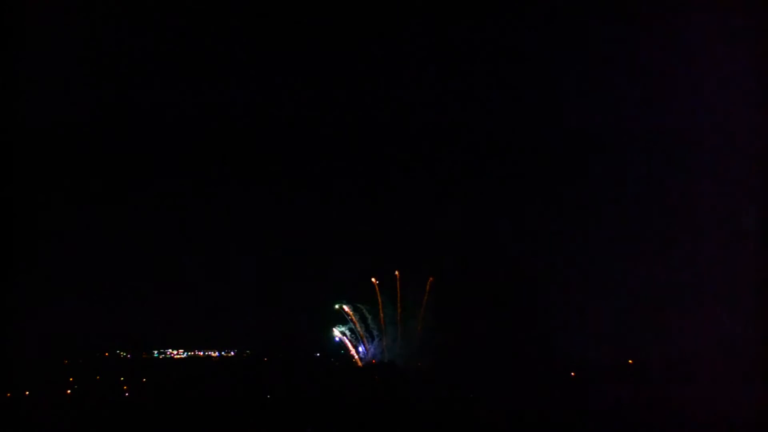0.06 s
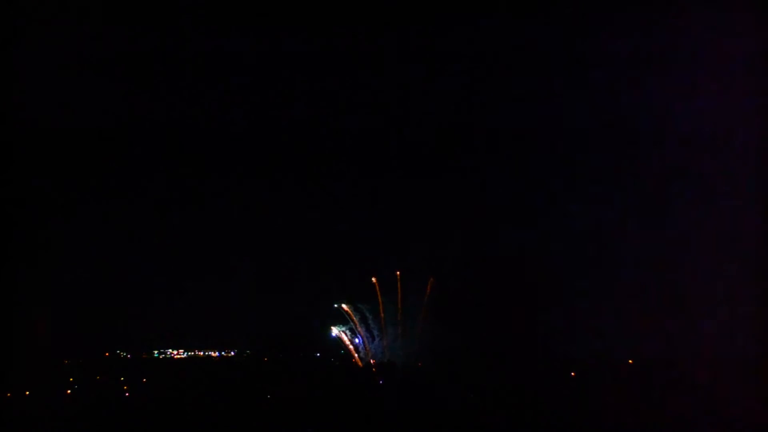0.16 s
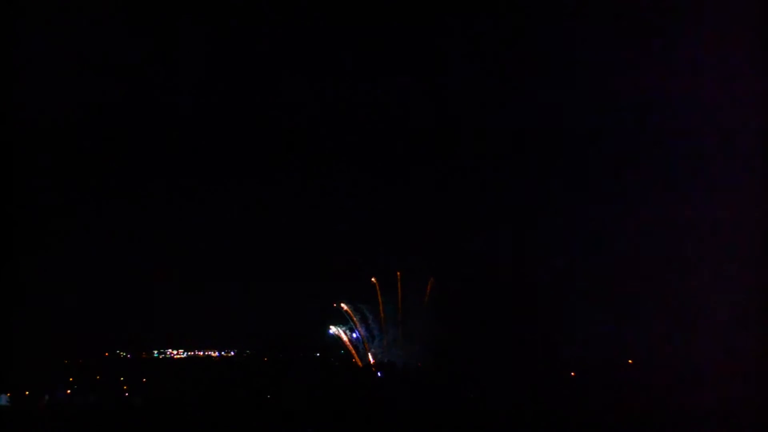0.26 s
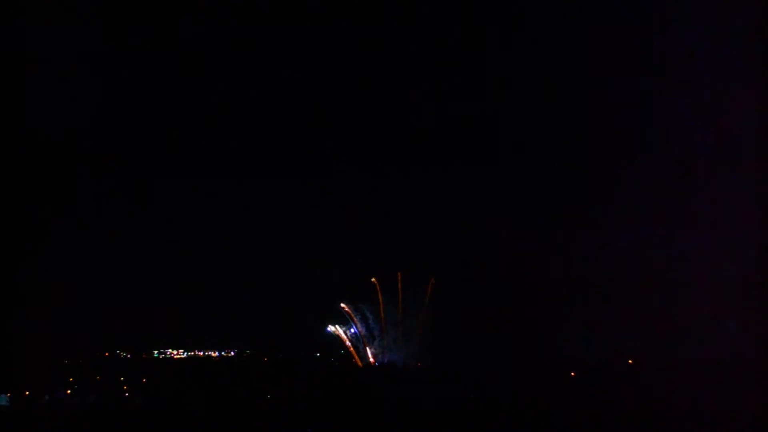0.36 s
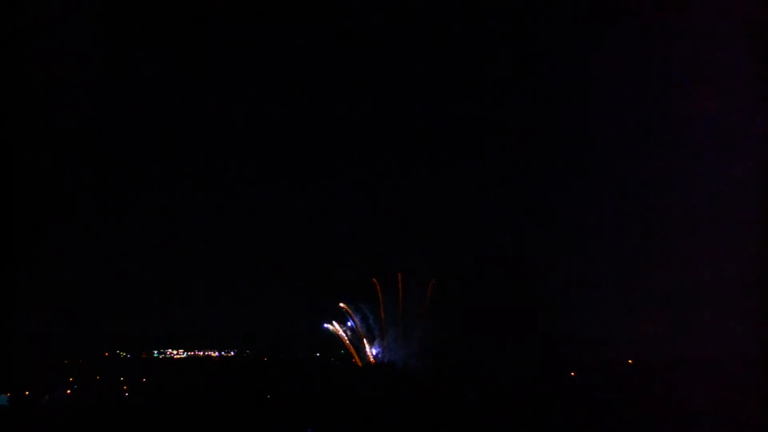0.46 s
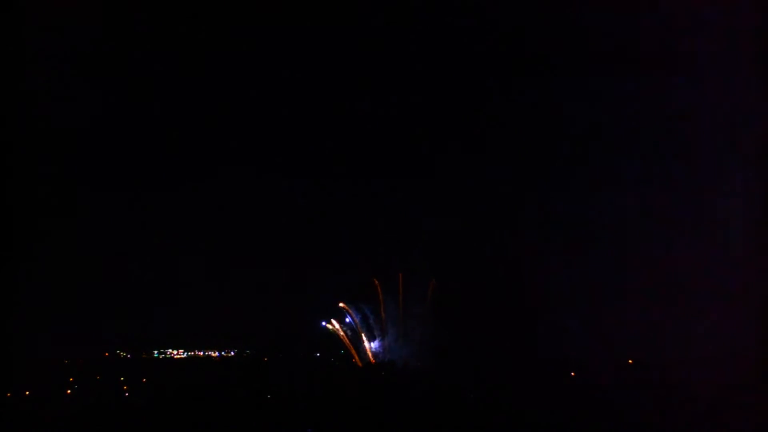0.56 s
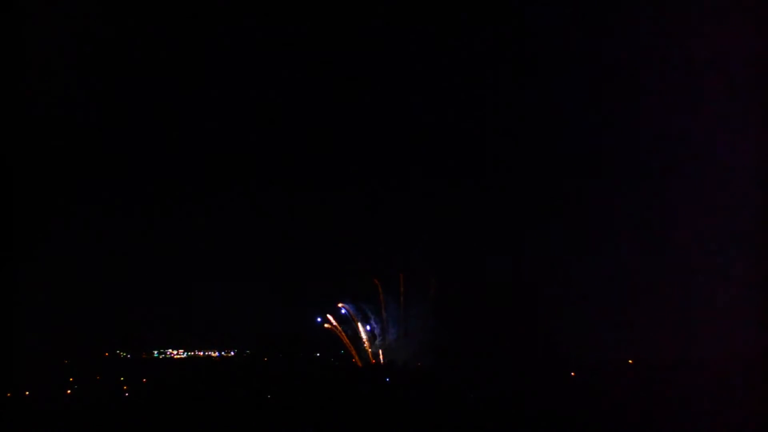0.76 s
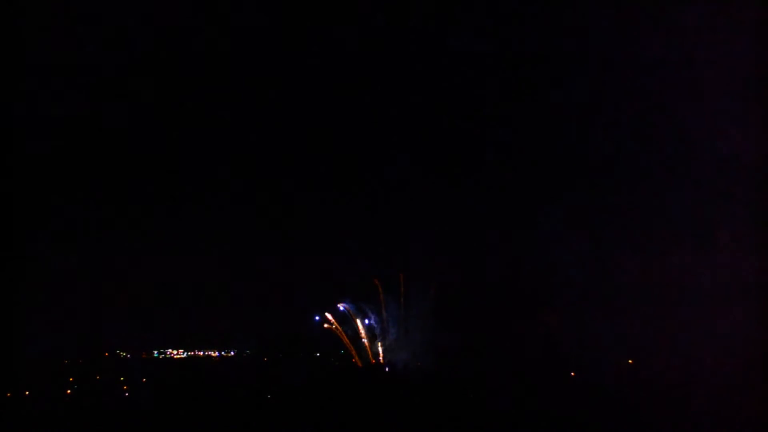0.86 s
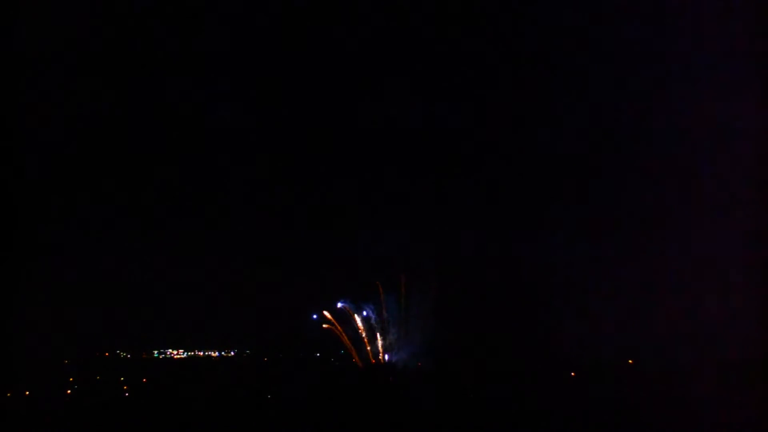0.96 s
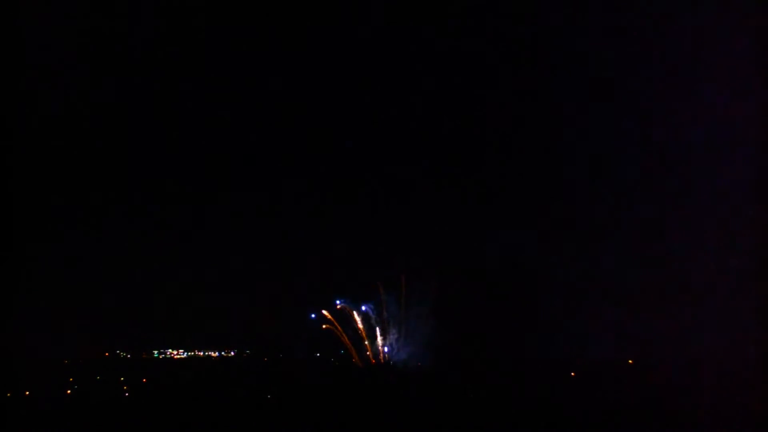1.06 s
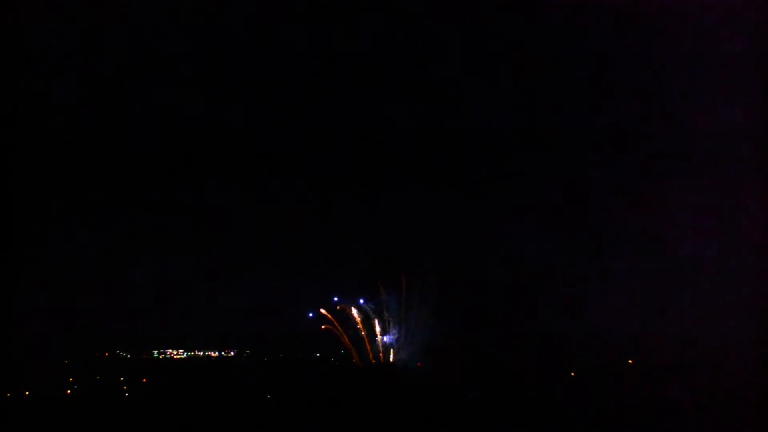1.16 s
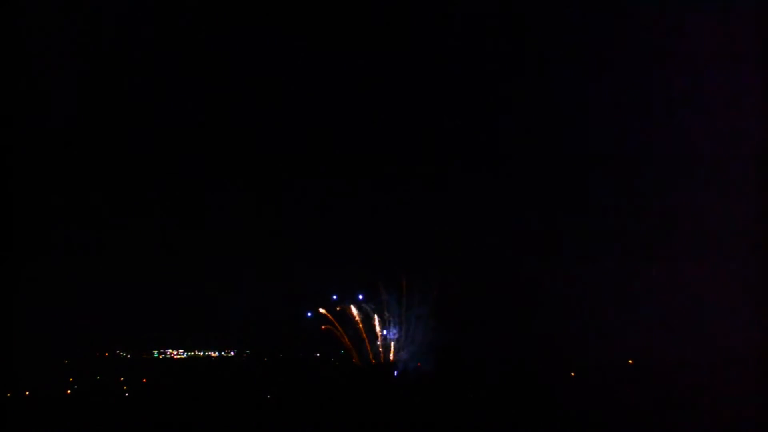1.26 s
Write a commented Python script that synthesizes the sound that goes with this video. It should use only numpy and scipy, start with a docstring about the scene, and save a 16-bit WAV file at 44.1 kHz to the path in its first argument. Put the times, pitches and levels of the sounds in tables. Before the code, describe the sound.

Two distant firework shells bang one right after the other over a light crackle, briefly distorting the microphone. Echoes roll back across open land as soft thuds and a dying rumble, above a low wash of far-off bursts.

```python
"""Distant fireworks at night

Over the fading crackle of burning stars, two shells bang in quick succession. Each blast wave and
its ground reflection overload the microphone; grainy echoes return from the land and die into a
rumble, with dull thuds from far slopes. Small charges crack sharply; a distant wash lies under it all."""
import sys
import numpy as np
from scipy import signal
from scipy.fft import rfft, irfft
from scipy.io import wavfile

SR = 44100
rng = np.random.default_rng(int(sys.argv[2]) if len(sys.argv) > 2 else 0)


def unload_audio(sound):
    """Save the sound as a 16-bit wav file, at the path given as the first command line argument."""
    columns = np.transpose(np.atleast_2d(sound))
    # keep every value between -1 and 1, then stretch to whole-number steps
    steps = np.round(np.clip(columns, -1, 1) * 32767)
    wavfile.write(sys.argv[1], SR, steps.astype(np.int16))


N = 57330  # 1.3 s


def from_db(db):
    """Decibels to gain."""
    return 10 ** (np.asarray(db) / 20)


def unit_rms(x):
    """Scale to rms 1."""
    return x / np.sqrt(np.mean(x ** 2) + 1e-20)


def seconds():
    """Time of every sample."""
    return np.arange(N) / SR


def envelope(rows):
    """Gain that follows rows of (s, dB)."""
    return from_db(np.interp(seconds(), *np.transpose(rows)))


def butter(x, hz, kind, order):
    """Causal high- or low-pass."""
    sos = signal.butter(order, hz, kind, fs=SR, output="sos")
    return signal.sosfilt(sos, x + 1e-18)


def colour(x, spectrum):
    """Filter x by rows of (Hz, dB)."""
    hz, db = np.transpose(spectrum)
    bins_hz = np.maximum(np.fft.rfftfreq(N, 1 / SR), 1)
    gain = from_db(np.interp(np.log(bins_hz), np.log(hz), db))
    return irfft(rfft(x) * gain, N)


def drift(corner_hz):
    """Slow random wander, rms 1."""
    pole = np.exp(-2 * np.pi * corner_hz / SR)
    smoothed = signal.lfilter([1], [1, -2 * pole, pole * pole], rng.standard_normal(2 * N))
    return unit_rms(smoothed[N:])


def grains(per_s, spread_db=2):
    """Random clicks of uneven size and sign, rms 1."""
    sizes = from_db(spread_db * np.minimum(rng.exponential(1, N), 3.5))
    signs = rng.choice([-1, 1], N)
    hits = rng.random(N) < per_s / SR
    return unit_rms(sizes * signs * hits)


# Each row: frequency in Hz, side level against mid in dB.
SIDE_SPECTRUM = [(60, -20), (300, -43), (1000, -61), (2000, -27.5), (4000, -19), (8000, -15)]


def stereo(mid, spectrum):
    """Coloured stereo pair, rms 1: nearly mono, wider in the treble and deep bass."""
    side = colour(rng.standard_normal(N), SIDE_SPECTRUM)
    return unit_rms(colour(np.array([mid + side, mid - side]), spectrum))


# Each row: time in seconds, level in dB.
CRACKLE_ENVELOPE = [(0, -32.5), (.07, -31.5), (.095, -34.5), (.125, -30.5), (.15, -33.5), (.22, -33.5),
                    (.76, -37.5), (.84, -33.5), (.89, -36), (1.1, -42.5), (1.22, -40), (1.3, -36.5)]
# Each row: frequency in Hz, relative level in dB.
CRACKLE_SPECTRUM = [(100, -34.5), (260, -17), (450, -7), (900, 1.5), (1600, 3.5), (2800, 2), (4400, -4),
                    (6500, -18), (8000, -29.5), (10000, -51.5)]


def crackle():
    """Burning stars give tiny pops in loose clumps."""
    pops_per_s = 1300 * from_db(0.84 * drift(corner_hz=25))
    return envelope(CRACKLE_ENVELOPE) * stereo(grains(pops_per_s), CRACKLE_SPECTRUM)


# Each row: time in seconds, level in dB.
WASH_ENVELOPE = [(0, -42), (.17, -40), (.3, -33.5), (.6, -30), (1.0, -31), (1.3, -30.5)]
# Each row: frequency in Hz, relative level in dB.
WASH_SPECTRUM = [(30, -28), (65, -13.5), (110, -25), (220, -20), (380, -2), (520, -4.5), (670, 1.5),
                 (850, -2.5), (1400, -6.5), (2500, -14), (4500, -25.5), (7000, -38), (10000, -63)]


def wash():
    """Far-off bursts blur into a faintly grainy roll that swells, then holds."""
    return envelope(WASH_ENVELOPE) * stereo(grains(per_s=2500), WASH_SPECTRUM)


# Each row: start in seconds, peak before filtering in dB, length in seconds, low-pass in Hz.
CRACK_PULSES = [(0.0587, -23, 0.00044, 3000), (0.06, -16, 0.00047, 3000), (0.079, -19, 0.00038, 2800),
                (0.117, -18, 0.00027, 2800), (0.139, -16, 0.00042, 2800), (0.174, -21, 0.00035, 3000),
                (0.2485, -2, .0007, 2500), (0.2500, -1, .001, 2500), (0.2519, -2, .0007, 2000),
                (0.2554, -6, .00022, 5500), (0.2657, -6, .0005, 5000), (0.2813, -4, .0005, 5500),
                (0.3051, -5, .0005, 3500), (0.3936, -2, .0012, 3500), (0.4087, -5, .0008, 2500),
                (0.4289, 1.5, .00034, 5000), (0.4300, 3, .00018, 7500), (0.4455, -8, .0002, 6500),
                (0.725, -28, .0003, 4000), (0.7985, -19, 0.00026, 4000), (0.9577, -24, 0.00035, 3500)]


def cracks():
    """Small charges and hard reflections: short N-shaped pulses, duller from farther off."""
    out = 0
    for start_s, db, length_s, lowpass_hz in CRACK_PULSES:
        phase = (seconds() - start_s) / length_s
        pulse = (2 * phase - 1) * ((phase >= 0) & (phase < 1))
        out += from_db(db) * butter(pulse, lowpass_hz, "low", order=3)
    return out


def blast_wave(start_s, push_s):
    """A shock front, a falling push and a shallow suction."""
    age_s = np.maximum(seconds() - start_s, 0)
    front = np.minimum(age_s * SR, 1)
    return front * (1 - age_s / push_s) * np.exp(-age_s / push_s)


# Each row: start in seconds, gain in dB, pressure push in seconds, high-pass in Hz, low-pass in Hz,
# ground reflection lag in seconds, reflection gain from 0 to 1.
SHELLS = [(0.24182, 25.4, .00157, 282, 490, .00299, .68), (0.38600, 27.4, .00095, 247, 345, .00299, .52)]


def bangs():
    """Each blast arrives directly and, drawn out, off the ground; its bass is cut and air dulls it."""
    out = 0
    for start_s, db, push_s, highpass_hz, lowpass_hz, lag_s, ground_gain in SHELLS:
        direct = blast_wave(start_s, push_s)
        reflected = ground_gain * blast_wave(start_s + lag_s, 2.7 * push_s)
        thinned = butter(direct + reflected, highpass_hz, "high", order=3)
        out -= from_db(db) * butter(thinned, lowpass_hz, "low", order=1)
    return out


# Nearby scatter, land echoes and long rumble. Each row: frequency in Hz, relative level in dB.
NEAR_SPECTRUM = [(60, -12), (170, 6), (400, 1.5), (1100, 0.5), (2200, -10), (4500, -20.5), (10000, -32)]
LAND_SPECTRUM = [(30, -25), (70, -13), (110, -3), (170, 2), (280, -1.5), (650, 1), (1300, -1), (3000, -8.5),
                 (5500, -20.5), (10000, -31)]
RUMBLE_SPECTRUM = [(30, -26), (75, -8.5), (170, -2.5), (330, -5.5), (700, 0.5), (1400, -1.5), (3000, -11.5),
                   (5500, -19), (10000, -43)]


def echoes(spectrum, level_db, delay_s, rise_s, t60_s, flutter_db):
    """A cloud of small reflections swells after each bang and dies away."""
    power = 0
    for start_s, *_ in SHELLS:
        age_s = np.maximum(seconds() - start_s - delay_s, 0)
        rise = np.minimum(age_s / rise_s, 1)
        decay = from_db(-60 * np.maximum(age_s - rise_s, 0) / t60_s)
        power += (rise * decay) ** 2
    gain = from_db(level_db + flutter_db * drift(corner_hz=36))
    return np.sqrt(power) * gain * stereo(grains(per_s=6000), spectrum)


# Each row: start in seconds, level at the crest in dB.
SLOPE_ECHOES = [(0.501, -27.5), (0.589, -32), (0.625, -30.5), (0.756, -35.5), (0.858, -37.5), (1.01, -32),
                (1.13, -38), (1.263, -41)]
# Each row: frequency in Hz, relative level in dB.
THUD_SPECTRUM = [(30, -34), (75, -7), (180, 4.5), (300, -3), (700, -2), (1400, -5), (3000, -23),
                 (8000, -62)]


def thuds(rise_s=0.018):
    """Far slopes send the bangs back as soft, dull swells."""
    power = 0
    for start_s, db in SLOPE_ECHOES:
        phase = np.maximum(seconds() - start_s, 0) / rise_s
        swell = phase * np.exp(1 - phase)
        power += (from_db(db) * swell) ** 2
    return np.sqrt(power) * stereo(rng.standard_normal(N), THUD_SPECTRUM)


def scene():
    """All layers, leaning slightly right; the air takes the highest treble."""
    near = echoes(NEAR_SPECTRUM, level_db=-8.5, delay_s=0.0035, rise_s=0.0012, t60_s=0.14,
                  flutter_db=2.6)
    land = echoes(LAND_SPECTRUM, level_db=-15.5, delay_s=0.002, rise_s=0.063, t60_s=0.63,
                  flutter_db=-0.5)
    rumble = echoes(RUMBLE_SPECTRUM, level_db=-27, delay_s=0.14, rise_s=0.11, t60_s=1.74,
                    flutter_db=1.65)
    mix = bangs() + near + land + rumble + thuds() + cracks() + crackle() + wash()
    right_lead_db = 0.37
    balance = from_db([[-right_lead_db / 2], [right_lead_db / 2]])
    return butter(mix, hz=10200, kind="low", order=8) * balance


def record(dry):
    """The microphone soft-clips on the bangs; a steep low-pass follows."""
    ceiling, cutoff_hz = 0.95, 10200
    clipped = ceiling * dry / (1 + dry ** 6) ** (1 / 6)
    lowpass = signal.ellip(10, rp=0.1, rs=70, Wn=cutoff_hz, fs=SR, output="sos")
    return signal.sosfilt(lowpass, clipped)


dry = scene()
out = record(dry)
unload_audio(out)
```